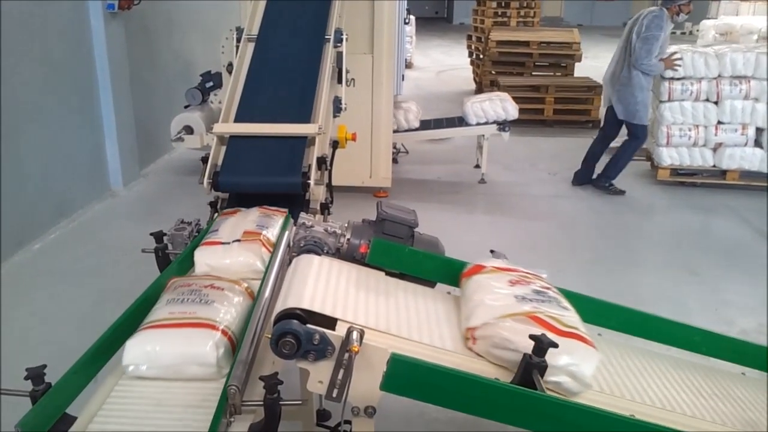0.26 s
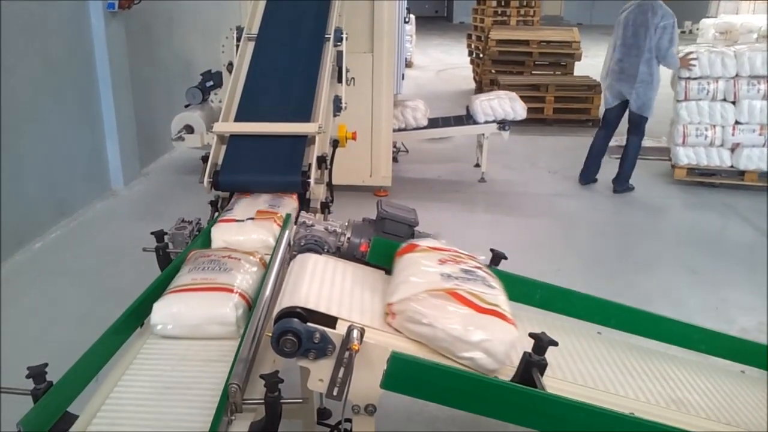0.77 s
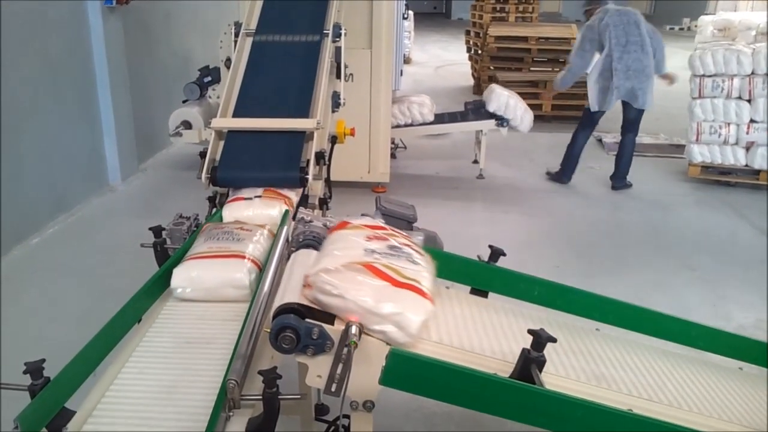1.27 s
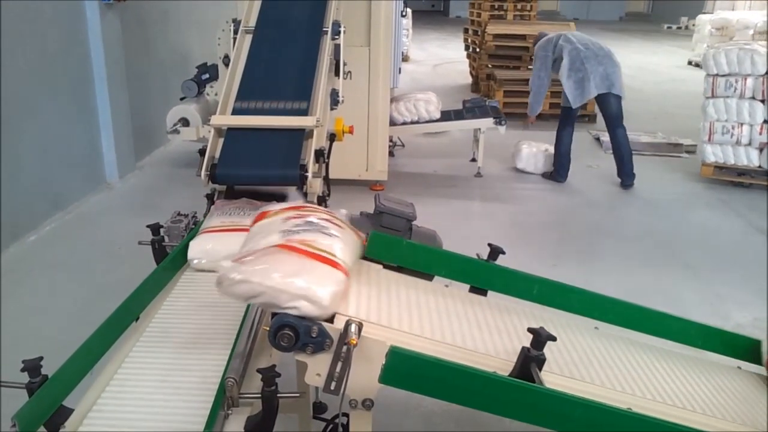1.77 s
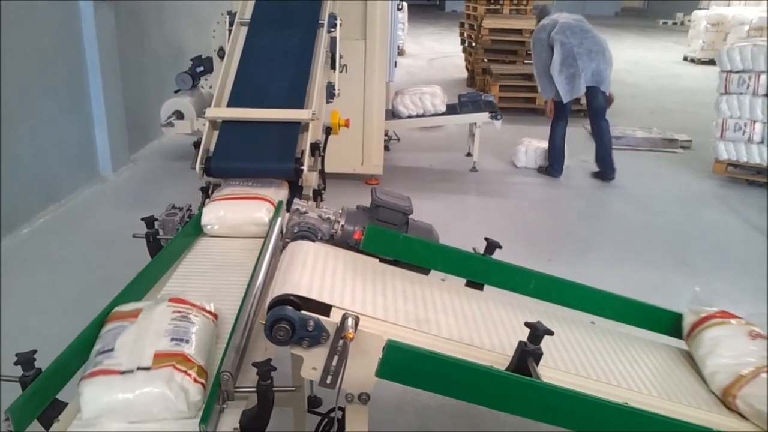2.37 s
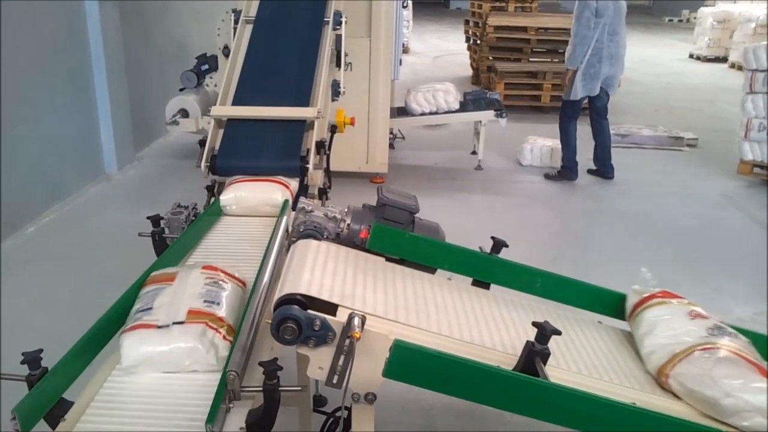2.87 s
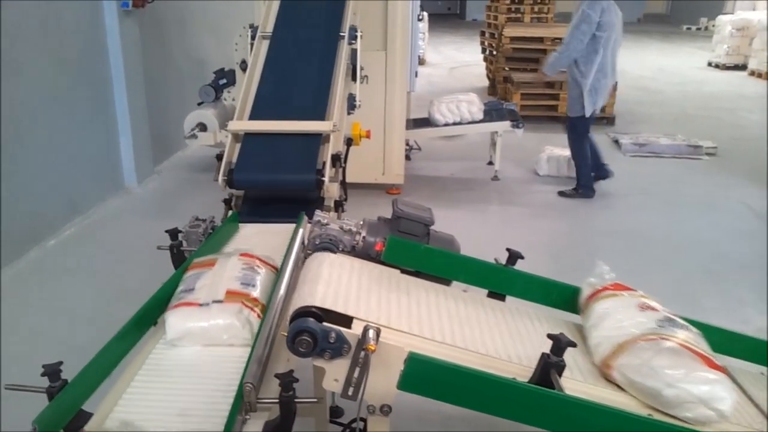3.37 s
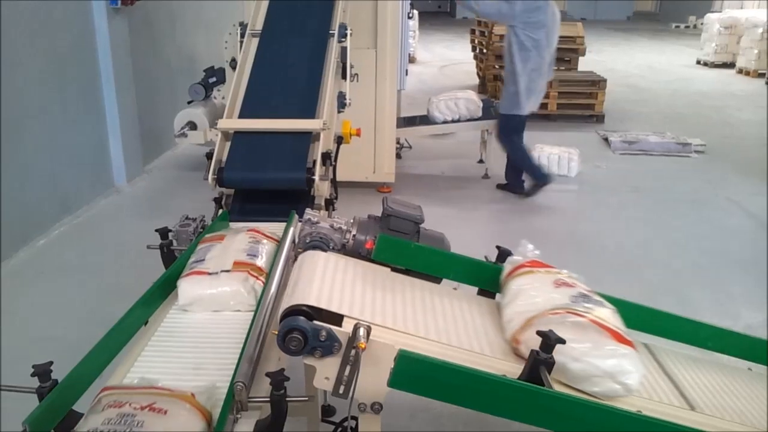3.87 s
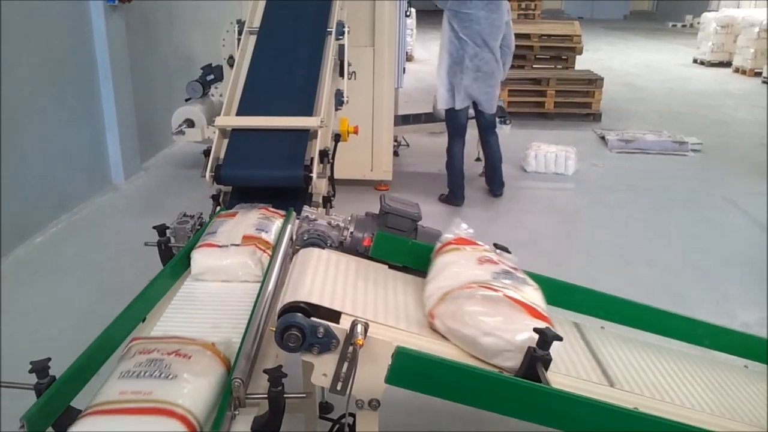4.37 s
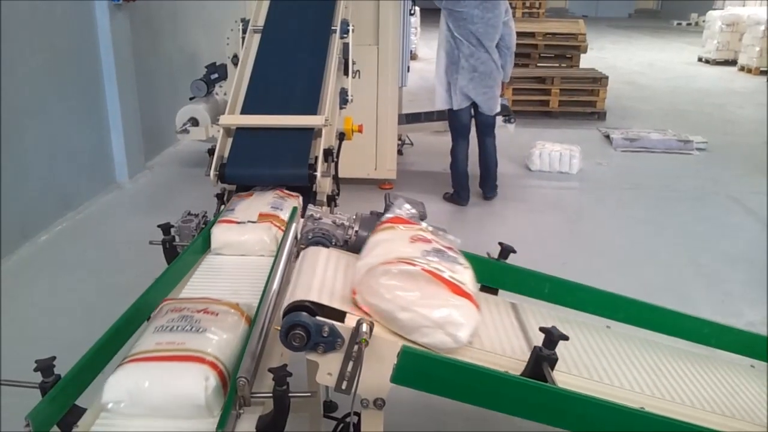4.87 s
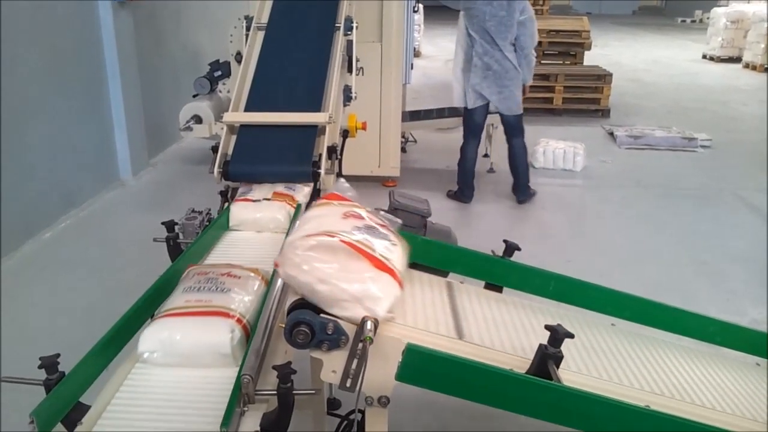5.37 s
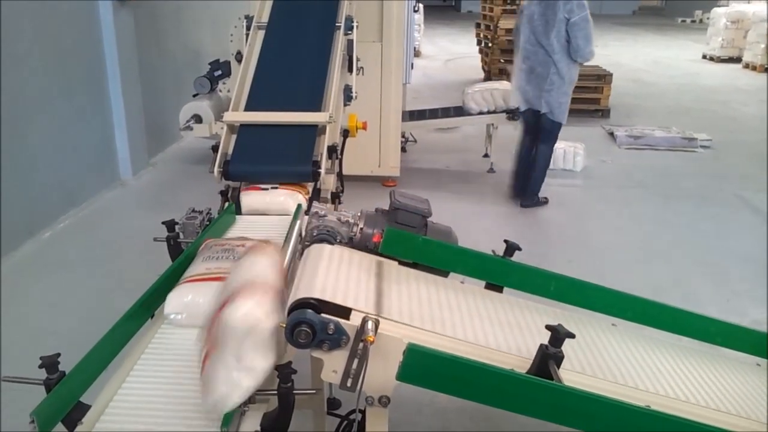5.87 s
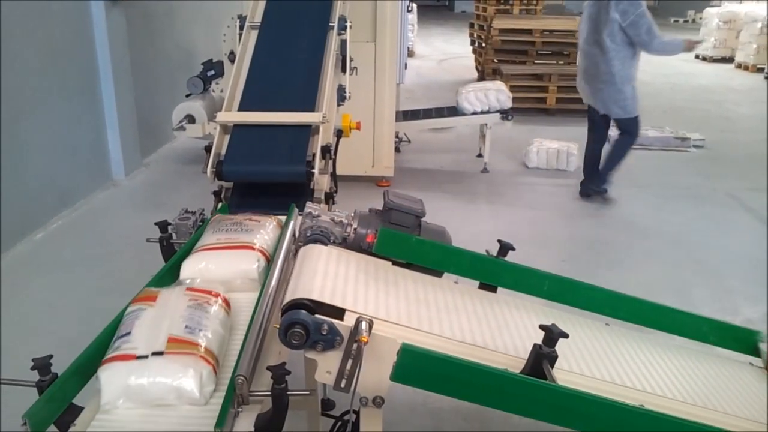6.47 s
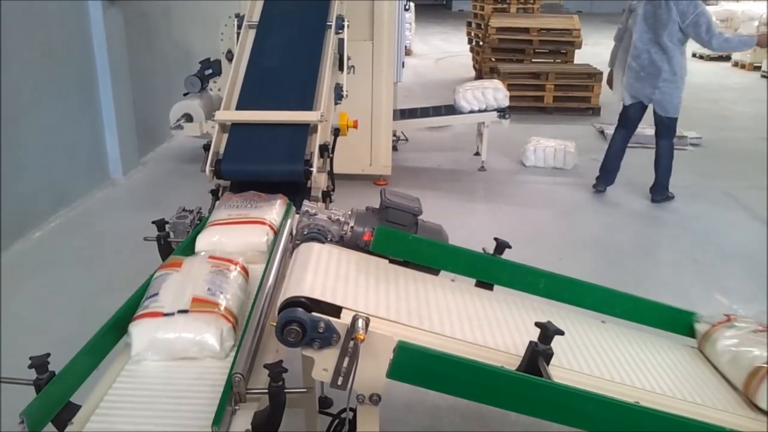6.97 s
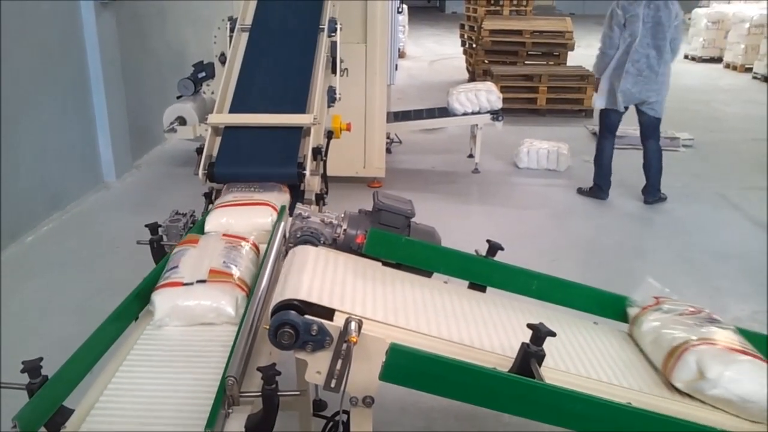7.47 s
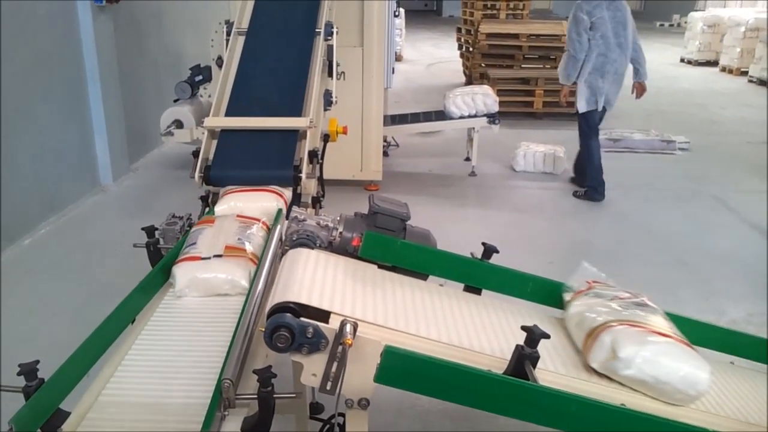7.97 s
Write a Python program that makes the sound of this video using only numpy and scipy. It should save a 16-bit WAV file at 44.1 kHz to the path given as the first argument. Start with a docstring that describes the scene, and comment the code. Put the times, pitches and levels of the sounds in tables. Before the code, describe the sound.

Conveyor belts rumble and gears whine under rapid pump chuffs, while compressed air hisses in bursts and machinery knocks, slams and rattles.

```python
"""Belts and motors rumble, gears whine and a roller squeals; a pump chuffs ten times a second in a factory hall.
This is a bagging line: compressed air blows in long and short jets, the machine slams, thunks and rattles.
Shaped noise makes rumble, whines, chuffs, jets and rushes; sines make squeals, thunks and the pump's tone;
struck resonances make slams and rattle, and knocks are cracks with noise tails.
Two close microphone ports hear the bass nearly in opposite phase; loud peaks overload them."""
import sys
import numpy as np
from scipy import signal
from scipy.fft import rfft, irfft
from scipy.io import wavfile
from scipy.ndimage import uniform_filter1d

SR = 44100
rng = np.random.default_rng(int(sys.argv[2]) if len(sys.argv) > 2 else 0)


def unload_wav(signal):
    """Save mono or channel-first audio to the path in sys.argv[1] as 16-bit WAV at rate SR, clipped to [-1, 1]."""
    wavfile.write(
        sys.argv[1],
        SR,
        np.round(np.clip(np.atleast_2d(signal).T, -1, 1) * 32767).astype(np.int16),
    )


N = 362502
T = np.arange(N) / SR   # s
HZ = np.maximum(np.fft.rfftfreq(N, 1 / SR), 1)   # spectral bins


def from_db(db):
    """dB to amplitude gain."""
    return 10 ** (np.asarray(db) / 20)


def in_time(rows):
    """Curve (time_s, value) at every sample."""
    time_s, values = np.transpose(rows)
    return np.interp(T, time_s, values)


def at_hz(rows, column=1):
    """Column of a frequency table at every bin, linear in log frequency."""
    rows = np.array(rows)
    return np.interp(np.log(HZ), np.log(rows[:, 0]), rows[:, column])


def drift(corner_hz):
    """Slow random curve of spread 1: noise through two equal low-pass poles."""
    step = 40   # samples per drawn value
    pole = np.exp(-2 * np.pi * corner_hz * step / SR)
    slow = signal.lfilter([1], [1, -2 * pole, pole * pole], rng.standard_normal(N // step + 2002))
    slow = slow[2000:]   # settled part
    return np.interp(np.arange(N) / step, np.arange(len(slow)), slow / slow.std())


# likeness of the ports: hz, coherence_0_1, phase_right_vs_left_rad
PORT_LIKENESS = [(60, 0.5, -3), (130, 0.6, -2.5), (213, 0.87, -2.5), (398, 0.78, -2.5), (550, 0.67, -2.5),
                 (900, 0.62, -2.07), (1400, 0.37, -1), (1700, 0.37, 0.5), (2250, 0.09, 2), (15000, 0, 2)]
# level difference of the ports: hz, left_minus_right_db
PORT_BALANCE = [(60, -0.5), (110, 12), (200, 5.5), (380, 4), (690, 1.5), (1280, 0.5), (2360, 0.5),
                (4360, -3.5), (8040, 3.0), (14800, 6)]


def at_ports(left, other):
    """Spectra at both ports: the right is a phase-turned share of the left plus the other sound."""
    alike = at_hz(PORT_LIKENESS)
    turn = np.exp(1j * at_hz(PORT_LIKENESS, column=2))
    right = alike * turn * left + np.sqrt(1 - alike ** 2) * other
    half_db = at_hz(PORT_BALANCE) / 2
    return np.array([left, right]) * from_db(np.array([half_db, -half_db]))


def hall_noise():
    """White noise spectra at the two ports, alike only as far as the hall allows."""
    return at_ports(*rfft(rng.standard_normal((2, N))))


def coloured(spectra, gain, band_hz=(0, SR)):
    """Stereo sound with a gain per bin; the mean of the ports has rms 1 within the band."""
    spectra = spectra * gain
    inside = (HZ > band_hz[0]) & (HZ < band_hz[1])
    power = 2 * np.sum(abs(spectra.mean(0)[inside]) ** 2)
    return irfft(spectra, N) * N / np.sqrt(power)


def band(x, hz, octaves):
    """Band-pass to rms 1."""
    edges_hz = hz * 2 ** (np.array([-.5, .5]) * octaves)
    edges_hz = np.clip(edges_hz, 20, .45 * SR)
    x = signal.sosfilt(signal.butter(3, edges_hz, "band", fs=SR, output="sos"), x)
    return x / x.std()


def ring(clicks, hz, t60_s):
    """Two-pole resonance: a unit click starts a decaying sine of height 1."""
    r, w = from_db(-60 / (t60_s * SR)), 2 * np.pi * hz / SR
    return signal.lfilter([0, np.sin(w)], [1, -2 * r * np.cos(w), r * r], clicks + 1e-18)


def swells(rows, floor_db, rise_s, fall_s):
    """Gain of a floor plus bumps (top_s, level_db): Gaussian rise, exponential fall of power."""
    power = from_db(floor_db) ** 2
    for top_s, level_db in rows:
        fade = np.where(T < top_s, ((top_s - T) / rise_s) ** 2, (T - top_s) / fall_s)
        power = power + from_db(level_db) ** 2 * np.exp(-fade)
    return np.sqrt(power)


# belt rumble spectrum: hz, relative_db
BELT_SPECTRUM = [(70, -80), (125, -43), (160, -23.5), (210, -13.5), (370, -7), (470, -9), (553, -7),
                 (685, -5), (780, -7), (1460, -10.5), (1710, -7), (2450, -13.5), (2980, -14.5), (4350, -31),
                 (8000, -24), (10400, -65)]
# belt load: time_s, level_300_1300hz_db
BELT_LOAD = [(0.0, -24), (0.39, -26), (0.96, -24), (1.39, -26.5), (1.92, -23.5), (2.45, -25.5),
             (2.65, -24.5), (3.52, -24.5), (3.94, -27), (5.79, -26), (6.0, -28), (7.19, -27), (7.81, -29),
             (8.22, -27.5)]
# low thuds, with deep jolts where loud peaks overload the recorder: top_s, level_90_160hz_db, level_30_90hz_db
LOW_THUDS = [(.1, -44, -54), (.27, -38, -43), (.62, -50, -68), (.94, -44, -56), (1.2, -49, -68),
             (1.72, -51, -57), (1.9, -45, -52), (2.08, -43, -60), (2.6, -51, -72), (2.81, -44, -55),
             (2.92, -47, -58), (3.25, -42.5, -56), (3.4, -50, -68), (3.54, -53, -60.5), (3.69, -49, -58),
             (4.12, -53, -75), (4.32, -53, -75), (4.84, -45, -68), (5.04, -48, -62), (5.22, -46, -54),
             (5.4, -46, -40), (5.48, -55, -60), (6.24, -47.5, -70), (6.53, -52, -72), (7.03, -46, -52),
             (7.37, -46, -68)]


def rumble(floor_db=-85, rise_s=0.032, t60_s=0.25):
    """Belts, rollers and motors as broad noise, over low thuds and deep jolts as swells of two low bands."""
    belts = coloured(hall_noise(), from_db(at_hz(BELT_SPECTRUM)), band_hz=(300, 1300))
    low = hall_noise()
    dull = coloured(low, (HZ / 130) ** 5.2 / (1 + (HZ / 130) ** 12.0), band_hz=(90, 160))
    deep = coloured(low, (HZ / 75) ** -0.6 / (1 + (HZ / 75) ** 5.6), band_hz=(30, 90))
    fall_s = t60_s / np.log(1e6)
    dull_gain = swells([(s, db) for s, db, _ in LOW_THUDS], floor_db, rise_s, fall_s)
    deep_gain = swells([(s, db) for s, _, db in LOW_THUDS], floor_db, rise_s, fall_s)
    thuds = dull_gain * dull + deep_gain * deep
    belt_gain = from_db(in_time(BELT_LOAD) + 1.37 * drift(10.5))
    return belt_gain * belts + from_db(1.8 * drift(18)) * thuds


PUMP_HZ, PUMP_FIRST_S = 10.32, .071


def stroke(lean=0.66, lead_s=0):
    """Pump cycle: 1 at the top of each stroke, -1 between; it rises faster than it falls."""
    phase = 2 * np.pi * PUMP_HZ * (T + lead_s - PUMP_FIRST_S) + 0.24 * drift(0.97)
    return np.cos(phase + lean * np.cos(phase))


# gear and motor whines: hz, width_hz, level_before_evening_db, waver_db
GEAR_WHINES = [(552, 47, -39, 3.0), (1635, 50, -37.5, 1.5)]
# brief swells of a low hum: top_s, level_before_evening_db
HUM_SWELLS = [(.1, -34.5), (1.06, -27), (2.05, -29), (2.57, -36), (3.09, -41)]


def whines(throb_db=1.5, hum_hz=236, hum_width_hz=7, hum_floor_db=-57, hum_swell_s=0.035):
    """Noise twice through narrow resonances, partly evened in level, throbbing with the pump."""
    white = hall_noise()

    def whine(hz, width_hz):
        """One resonance; its slow level swings are partly divided out."""
        tone = coloured(white, 1 / (1 + (2 * (HZ - hz) / width_hz) ** 2))
        power = uniform_filter1d(tone.mean(0) ** 2, size=500)
        return tone / (power + .15) ** .38

    gears = 0
    for hz, width_hz, level_db, waver_db in GEAR_WHINES:
        gears = gears + from_db(level_db + waver_db * drift(4.3)) * whine(hz, width_hz)
    hum_gain = swells(HUM_SWELLS, hum_floor_db, hum_swell_s, hum_swell_s)
    hum = hum_gain * whine(hum_hz, hum_width_hz)
    return (gears + hum) * from_db(throb_db * stroke())


# swell of the pump's tone: time_s, relative_db
TONE_SWELL = [(0, -1), (.2, 2), (.3, 0), (.5, 4), (.95, -11), (1.1, 5), (1.3, 6.5), (1.42, -4), (1.8, 5.5),
              (2.1, -11), (2.4, 5), (3.0, 1), (3.3, -6), (3.6, 6), (3.85, -1), (4.85, -5), (4.97, 7.5),
              (5.5, 3), (5.85, 3), (5.95, 0), (6.38, -6), (6.48, 1), (6.95, 0), (7.05, -6), (7.3, -19),
              (8.0, -12), (8.22, -8)]


def pump_tone(hz=1757, level_db=-33, waver_hz=7.95, throb_db=5.5, lead_s=.024):
    """Wavering sine, peaking just before each chuff; reflections shift phase and level at each port."""
    phase = 2 * np.pi * np.cumsum(hz + waver_hz * drift(6.2)) / SR
    level_db = level_db + in_time(TONE_SWELL) + throb_db * stroke(lean=0.22, lead_s=lead_s)
    gain = from_db(level_db + 1.2 * np.array([drift(7.8), drift(9.4)]))
    port_phase = np.array([0 * T, 0.4 * drift(4.4)])
    return gain * np.sin(phase + port_phase)


# chuffing air spectrum: hz, relative_density_db
CHUFF_SPECTRUM = [(2940, -52), (5000, -3), (8260, 6), (10300, 4), (11300, -3.5), (13900, -18), (14600, -1)]
# chuffing air, level the strokes swing about: time_s, level_db
CHUFF_LEVEL = [(0, -25.5), (.5, -27), (1.0, -26.5), (1.5, -27.5), (2.0, -31), (2.6, -34), (3.2, -25),
               (3.45, -31), (4.0, -35), (5.0, -27), (5.6, -23), (6.0, -24.5), (7.0, -24), (8.22, -27.5)]


def pump():
    """High air noise that swells with every stroke, not equally each time."""
    swell_db = 4.2 * stroke() + 2.1 * drift(2.4)
    air = coloured(hall_noise(), from_db(at_hz(CHUFF_SPECTRUM)))
    return from_db(in_time(CHUFF_LEVEL) + swell_db) * air


# faint roller squeals: start_s, length_s, first_hz, last_hz, level_db
ROLLER_SQUEALS = [(-.04, 0.88, 955, 975, -27.5), (1.08, .4, 935, 905, -31), (.73, 0.105, 726, 765, -23.5)]


def squeals(arch_hz_per_s=62, waver_hz=14, fade_s=.04):
    """Sines whose pitch wavers and arches, higher if longer; reflections vary them at each port."""
    out = np.zeros((2, N))
    for start_s, length_s, first_hz, last_hz, level_db in ROLLER_SQUEALS:
        along = np.clip((T - start_s) / length_s, 0, 1)
        arch_hz = arch_hz_per_s * length_s * np.sin(np.pi * along)
        hz = first_hz + (last_hz - first_hz) * along + arch_hz
        phase = 2 * np.pi * np.cumsum(hz + waver_hz * drift(33.0)) / SR
        fade = np.clip(np.minimum(along, 1 - along) * length_s / fade_s, 0, 1)
        gain = from_db(level_db + 1.2 * np.array([drift(9), drift(7.8)]))
        port_phase = np.array([0 * T, .5 * drift(4.7)])
        out += fade * gain * np.sin(phase + port_phase)
    return out


def nozzle_gain(hiss, bumps):
    """Nozzle gain per bin: hiss with narrow peaks, or dips where the bump is negative."""
    gain_db = at_hz(hiss)
    for hz, width_hz, over_hiss_db in bumps:
        gain_db = gain_db + over_hiss_db / (1 + (2 * (HZ - hz) / width_hz) ** 2)
    return from_db(gain_db)


def valve(open_s, close_s, level_db, time_constant_s=0.019):
    """Power of one blast: it opens, holds and closes along tanh curves."""
    opening = np.tanh((T - open_s) / time_constant_s)
    closing = np.tanh((T - close_s) / time_constant_s)
    return from_db(level_db) ** 2 * (opening - closing) / 2


# nozzle hiss, first and second: hz, relative_density_db
HISS_1 = [(880, -47), (1500, -2), (1590, -34), (1700, -36), (1830, -30), (1920, -11.5), (2410, -3),
          (2680, -5), (3340, 1.5), (5970, -5.5), (9240, -4.5), (12700, -10), (14600, -10)]
HISS_2 = [(650, -69), (1100, -14), (1470, -2.5), (1790, -9.5), (2220, -2.5), (2530, -3), (4590, -6),
          (6920, -10), (8320, -4.5), (9680, -10.5), (13500, -13.5), (14600, -5.5)]
# narrow peaks and one dip in the first nozzle's hiss, narrow peaks in the second's: hz, width_hz, over_hiss_db
HISS_BUMPS_1 = [(3500, 77, 0.5), (7700, 20, -4), (9400, 170, 2)]
HISS_BUMPS_2 = [(2220, 160, 3), (1950, 120, 4.5), (3500, 500, 1), (1500, 150, 1), (2190, 44, 4.5),
                (8300, 900, 1)]
# air that always escapes: time_s, level_3_6.5khz_db
AIR_LEAK = [(0, -29), (.7, -24.5), (1.2, -27.5), (1.9, -24), (2.8, -24), (3.1, -26.5), (3.6, -26.5),
            (5.0, -26), (5.3, -27), (5.7, -26.5), (8.22, -30)]
# blasts of the first nozzle; one blast of the second: open_s, close_s, level_3_6.5khz_db
NOZZLE_BLASTS_1 = [(0.2, 0.578, -24), (1.164, 1.58, -24), (2.19, 2.59, -25.5), (3.536, 3.74, -26),
                   (5.754, 8.4, -21.5)]
NOZZLE_BLAST_2 = (3.81, 4.97, -22.5)


def jets(top_hz=10500, open_db=-21, dulling=0.5):
    """Smooth bright air noise from the leak and two nozzles; a weaker jet loses its top first."""
    power_1 = from_db(in_time(AIR_LEAK)) ** 2 + sum(valve(*blast) for blast in NOZZLE_BLASTS_1)
    power_2 = valve(*NOZZLE_BLAST_2)
    level_db = 10 * np.log10(power_1 + power_2)
    first = coloured(hall_noise(), nozzle_gain(HISS_1, HISS_BUMPS_1), band_hz=(3000, 6500))
    second = coloured(hall_noise(), nozzle_gain(HISS_2, HISS_BUMPS_2), band_hz=(3000, 6500))
    air = (np.sqrt(power_1) * first + np.sqrt(power_2) * second) / from_db(level_db)
    top = irfft(rfft(air) / (1 + (top_hz / HZ) ** 4.5), N)
    top_db = dulling * (level_db - open_db) + 0.93 * drift(6.0)
    air = air - top + top * from_db(top_db)
    return from_db(level_db + 0.89 * drift(14.0)) * air


# valves venting, bags sliding or landing: start_s, rise_s, fall_t60_s, level_db, centre_hz, width_octaves
AIR_RUSHES = [(.535, 0.036, 0.24, -19, 1500, 0.97), (.53, .03, 0.26, -17, 9000, 1.7),
              (3.18, 0.22, 1.5, -15.5, 1400, 0.67), (3.2, 0.17, 1.4, -16, 3400, 0.81),
              (3.525, 0.028, 0.19, -12.5, 9960, 1.6), (3.676, 0.021, 0.37, -7.5, 7860, 4.6)]


def rushes():
    """Noise bands that swell softly and die away."""
    white, out = irfft(hall_noise(), N), np.zeros((2, N))
    for start_s, rise_s, t60_s, level_db, hz, octaves in AIR_RUSHES:
        part = slice(round(start_s * SR), round((start_s + 1.5) * SR))
        t = T[part] - T[part][0]
        rise = np.sin(np.pi / 2 * np.minimum(t / rise_s, 1))
        fall = from_db(-60 * np.maximum(t - rise_s, 0) / t60_s)
        out[:, part] += from_db(level_db) * rise * fall * band(white[:, part], hz, octaves)
    return out


def rattle(ticks_per_s=90, level_db=-34):
    """Random ticks of chains and film, each ringing for about ten cycles at one of ten pitches."""
    sizes = from_db(1.3 * np.minimum(rng.exponential(1, (2, N)), 4))
    ticks = sizes * (rng.random(N) < ticks_per_s / SR)
    pitch_index = rng.integers(0, 10, N)
    pitches_hz = np.geomspace(1500, 11000, 10)
    rings = [ring(ticks * (pitch_index == k), hz, 10.0 / hz) for k, hz in enumerate(pitches_hz)]
    return from_db(level_db) * sum(rings)


# knocks, and the noise of the jaw slams: start_s, level_before_evening_db, centre_hz, width_octaves, t60_s
KNOCK_BANDS = [(0.179, -11, 1730, 0.92, 0.087), (.537, -11.5, 1700, 0.82, 0.27),
               (1.523, -12.5, 1640, 0.64, 0.42), (1.626, -14, 2000, 2.4, 0.33),
               (1.713, -12, 1700, .8, 0.055), (1.722, -10, 2380, 1.5, 0.065), (1.871, -14, 2330, 0.46, .04),
               (1.885, -10, 3200, 1.3, 0.23), (1.887, -11, 9000, 1.2, 0.12), (1.895, -16, 900, 1.4, 0.15),
               (1.91, -13, 700, .7, 0.076), (2.064, -14, 4000, 1.8, .06), (2.201, -14.5, 3500, 0.86, 0.054),
               (2.291, -11, 4000, 0.97, .03), (2.324, -14, 3000, 1.5, .028), (2.357, -22, 3980, .9, .027),
               (2.841, -12.5, 1580, 3.1, 0.2), (2.931, -11.5, 600, 1.4, 0.21),
               (2.933, -15.5, 3600, 1.0, 0.19), (2.971, -9.5, 3000, 3, .035), (2.979, -9, 1600, 0.93, .04),
               (3.018, -11, 1800, 0.8, 0.037), (3.0195, -13.5, 5500, 1.8, 0.047),
               (3.022, -14, 2100, 0.75, 0.05), (3.291, -17, 1800, 1, .12), (3.345, -12, 2000, 2.1, .12),
               (3.821, -20, 2140, 1.1, .062), (4.881, -13, 1050, 0.68, 0.21), (5.91, -18, 550, 1.1, 0.12),
               (6.249, -13.5, 745, 2.5, .19), (7.02, -17, 800, 0.7, 0.054), (7.024, -10, 3100, 1.7, .2),
               (7.032, -15, 900, 1.6, 0.15), (7.047, -16, 780, 0.62, .06), (8.07, -9, 590, 0.75, 0.075),
               (8.081, -17, 700, 1.3, 0.096), (8.108, -16, 3600, 0.67, .06), (8.118, -12, 2000, 1.3, .05),
               (8.126, -13, 1060, 0.9, .06), (8.158, -15, 2500, 2.1, 0.05), (8.168, -18, 3300, .7, 0.1)]


def knocks(crack_db=12.0, evening=0.35):
    """Knocks, and the noise of the jaw slams: a crack alike at both ports, with a fairly even noise tail."""
    white, out = irfft(hall_noise(), N), np.zeros((2, N))
    for start_s, level_db, hz, octaves, t60_s in KNOCK_BANDS:
        part = slice(round(start_s * SR), round((start_s + 0.3) * SR))
        t = T[part] - T[part][0]
        tail = band(white[:, part], hz, octaves)
        power = uniform_filter1d(tail.mean(0) ** 2, size=int(3 * SR / hz))
        tail = tail / (2 * power + .1) ** evening
        tail = np.minimum(t / 0.0005, 1) * from_db(-60 * t / t60_s) * tail
        crack = band(1.0 * (t == 0), hz, octaves)
        crack_peak = from_db(crack_db) * hz / 4000   # higher knocks crack more
        crack = crack_peak * crack / abs(crack).max()
        out[:, part] += from_db(level_db) * (crack + tail)
    return out


# hollow cylinder thunks: start_s, level_db
CYLINDER_THUNKS = [(0.251, -3), (5.382, -3)]


def thunks(hz=355, low_hz=240, low_db=-12, rise_s=0.003, hold_s=0.019, fade_s=0.0024):
    """A hollow body is driven for some six cycles, then damped; it reaches both ports directly."""
    out = np.zeros(N)
    for start_s, level_db in CYLINDER_THUNKS:
        t = np.maximum(T - start_s, 0)
        rise = 1 - np.exp(-t / rise_s)
        damping = 1 / (1 + np.exp(np.minimum((t - hold_s) / fade_s, 50)))
        tone = np.sin(2 * np.pi * hz * t) + from_db(low_db) * np.sin(2 * np.pi * low_hz * t)
        out += from_db(level_db) * rise * damping * tone
    spectrum = rfft(out)
    return irfft(at_ports(spectrum, 0.54 * spectrum), N)


# jaws close: first_contact_s, level_db
JAW_SLAMS = [(1.885, -7.5), (7.0235, -9)]
# modes of the steel frame, each starting after its own delay: hz, relative_db, t60_s, delay_s
FRAME_MODES = [(417, -11, 0.061, 0.0032), (733, -2, 0.088, 0.013), (1020, 1, 0.025, .0097),
               (1130, -2, 0.036, 0.0097), (1500, -7, 0.06, 0.0022), (1930, -5.5, 0.06, 0.0036),
               (2280, 3, 0.033, 0.0012), (2450, -3, 0.038, 0.012), (2900, -16, 0.046, .004),
               (3190, -7, 0.046, .004), (3740, -4, 0.05, 0.017), (4340, 0, 0.034, 0.008),
               (4900, -0.5, 0.042, 0.00086), (5030, -9, .03, 0.00037)]


def slams(chatter_s=.032, chatter_db=-16):
    """Jaws hit and chatter: a hard contact alike at both ports, then uneven ones, into the frame's modes."""
    out = np.zeros((2, N))
    for hz, mode_db, t60_s, delay_s in FRAME_MODES:
        clicks = np.zeros((2, N))
        for contact_s, level_db in JAW_SLAMS:
            after_s = np.r_[0, (chatter_s - delay_s) * rng.random(23)]
            at = ((contact_s + delay_s + after_s) * SR).astype(int)
            clicks[:, at] = from_db(level_db + mode_db + chatter_db) * rng.normal(0, 1, (2, 24))
            clicks[:, at[0]] = from_db(level_db + mode_db)
        out += ring(clicks, hz, t60_s)
    return out


def scene():
    """All sources at the two ports."""
    background = rumble() + whines() + pump_tone() + pump() + squeals()
    air = jets() + rushes()
    blows = rattle() + knocks() + thunks() + slams()
    return background + air + blows


def record(dry, knee_db=-11, release_db_s=25, share=0.16, low_cut_hz=70, top_cut_hz=14800):
    """Gain ducks after loud moments and recovers; bass is cut, peaks overload, the top is cut."""
    level_db = 10 * np.log10(uniform_filter1d(np.mean(dry ** 2, axis=0), size=600) + 1e-9)
    excess_db = np.maximum(level_db - knee_db, 0)
    held_db = np.maximum.accumulate(excess_db + release_db_s * T) - release_db_s * T
    late_db = signal.lfilter([.0015], [1, .0015 - 1], held_db)   # lags by some 15 ms
    ducked = dry * from_db(-share * late_db)
    x = signal.sosfilt(signal.butter(3, low_cut_hz, "high", fs=SR, output="sos"), ducked)
    overloaded = x / (1 + abs(x / 1.46) ** 14.0) ** (1 / 6.0)   # the tallest peaks bend back down
    low_pass = signal.cheby2(26, 85, top_cut_hz, fs=SR, output="sos")
    return np.clip(signal.sosfilt(low_pass, overloaded), -1, 1)


dry = scene()
out = record(dry)
unload_wav(out)
```